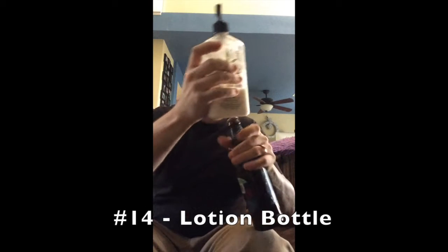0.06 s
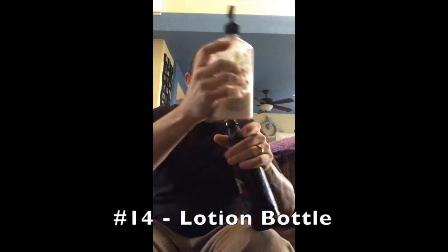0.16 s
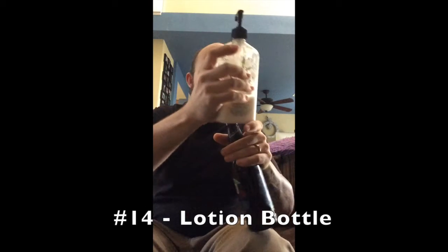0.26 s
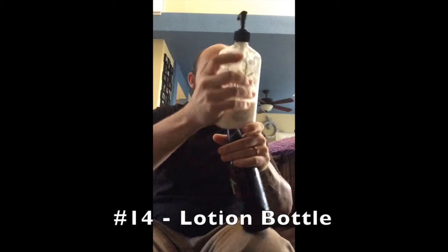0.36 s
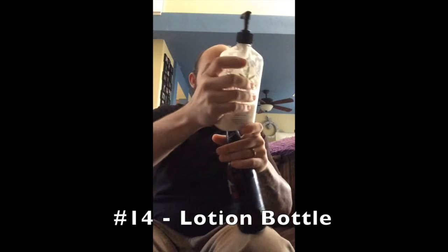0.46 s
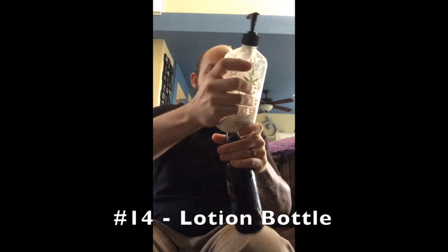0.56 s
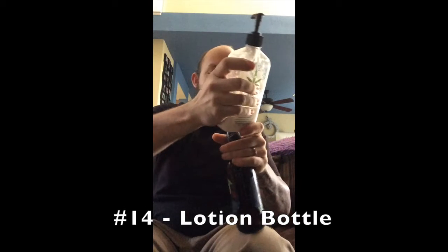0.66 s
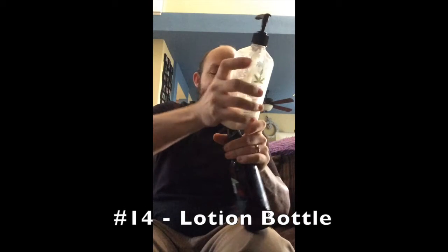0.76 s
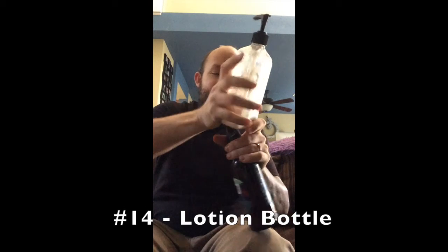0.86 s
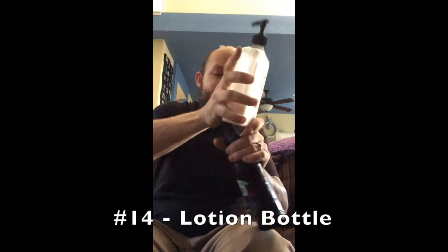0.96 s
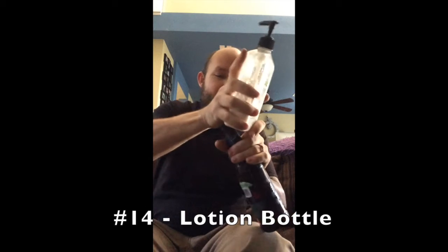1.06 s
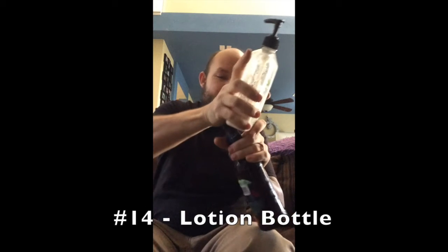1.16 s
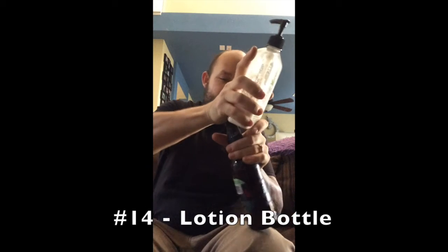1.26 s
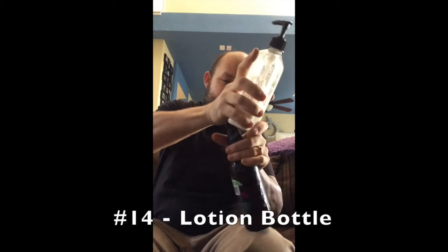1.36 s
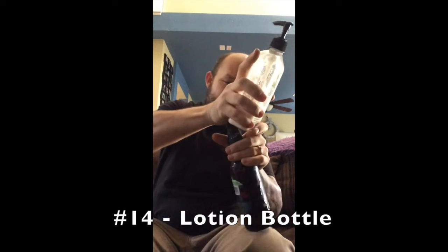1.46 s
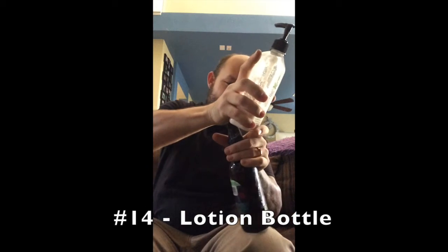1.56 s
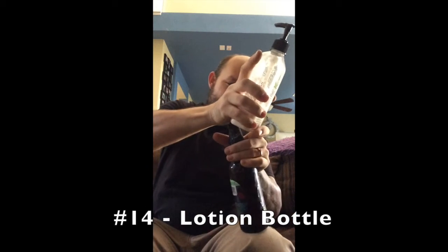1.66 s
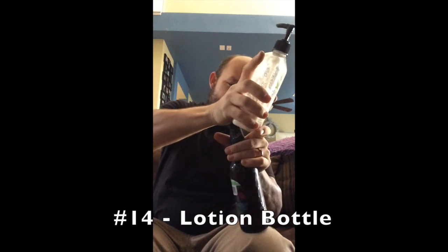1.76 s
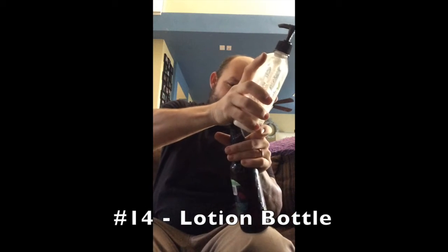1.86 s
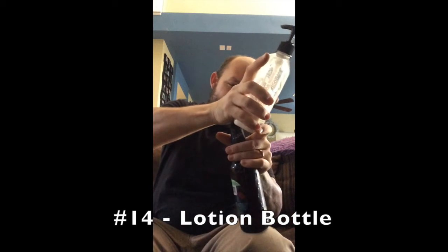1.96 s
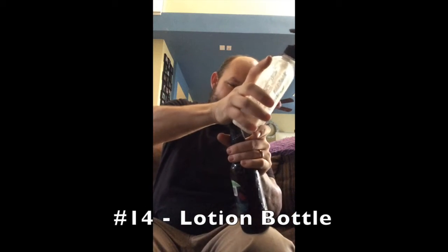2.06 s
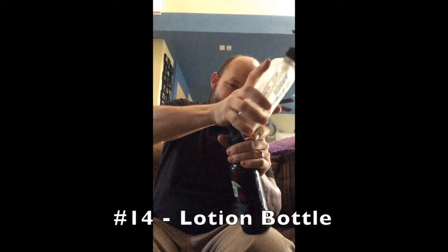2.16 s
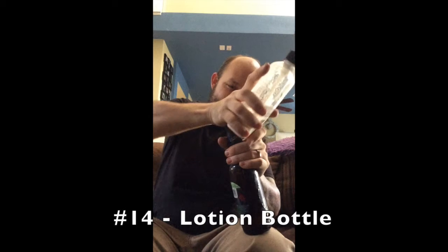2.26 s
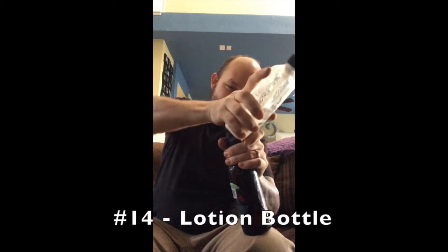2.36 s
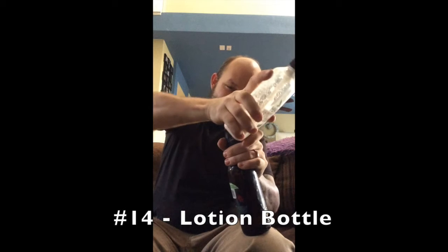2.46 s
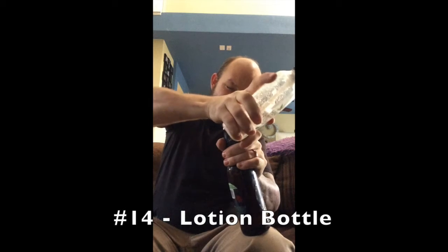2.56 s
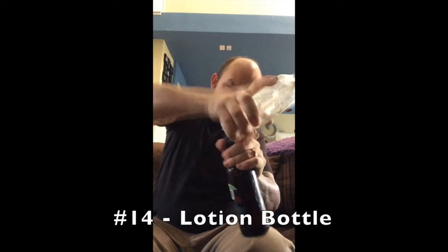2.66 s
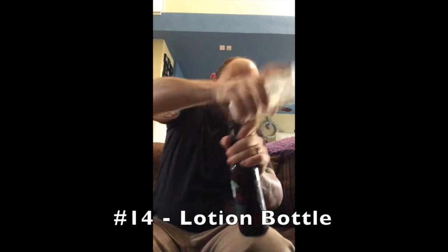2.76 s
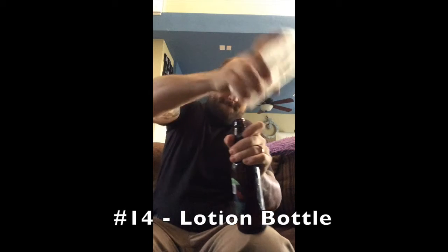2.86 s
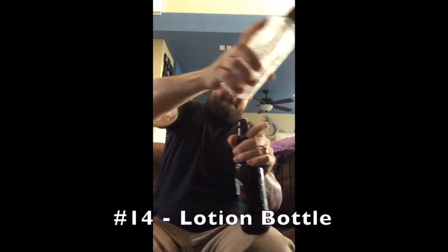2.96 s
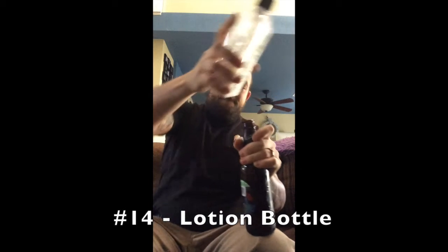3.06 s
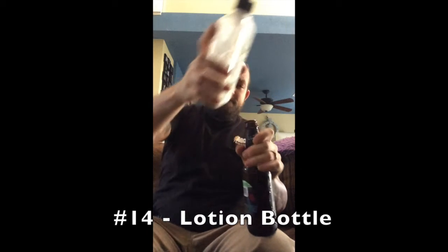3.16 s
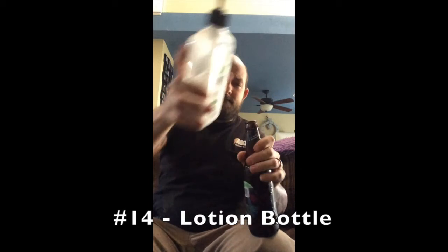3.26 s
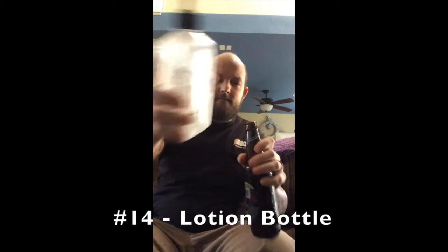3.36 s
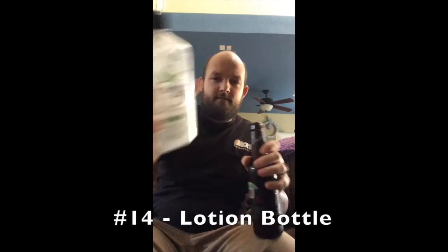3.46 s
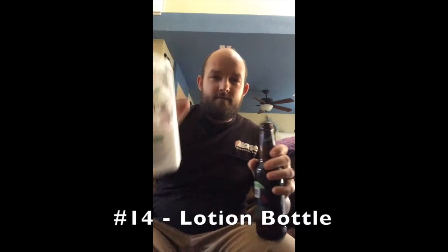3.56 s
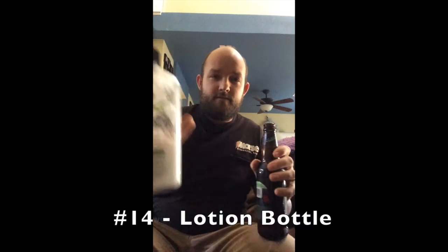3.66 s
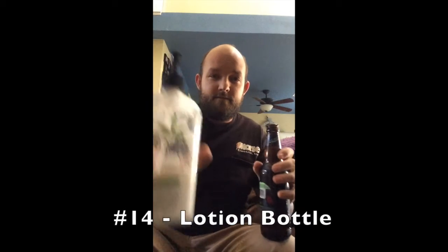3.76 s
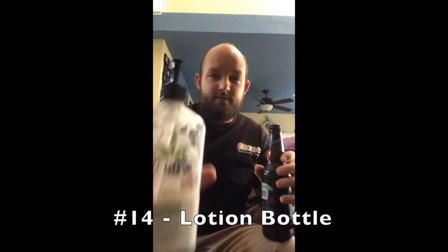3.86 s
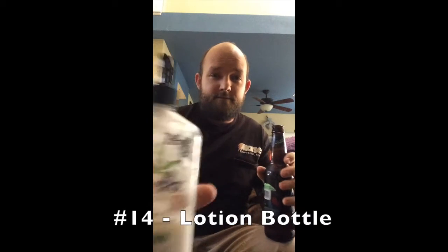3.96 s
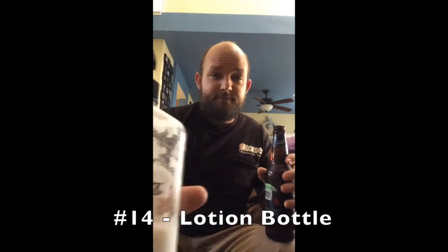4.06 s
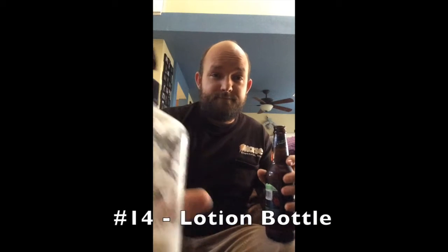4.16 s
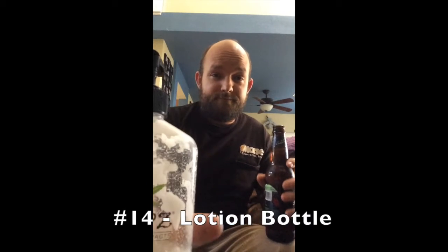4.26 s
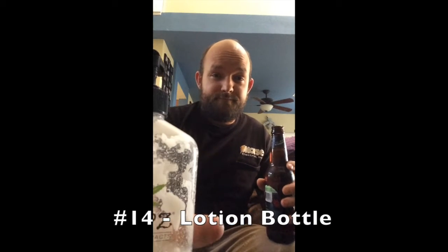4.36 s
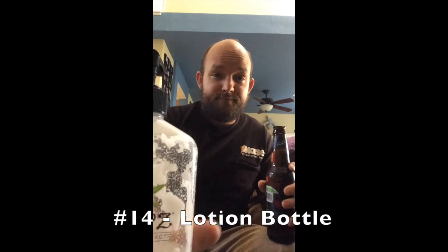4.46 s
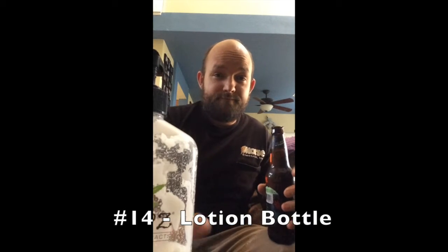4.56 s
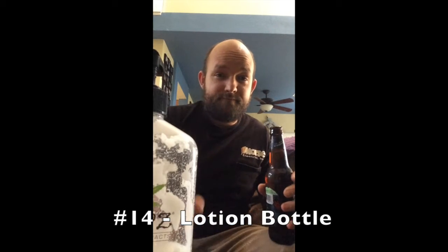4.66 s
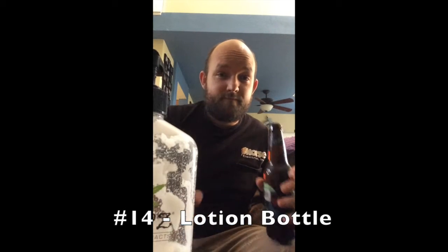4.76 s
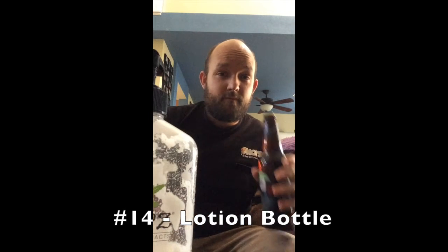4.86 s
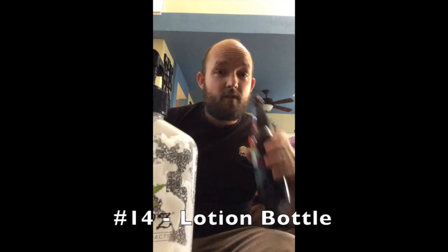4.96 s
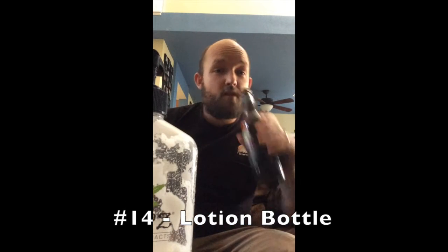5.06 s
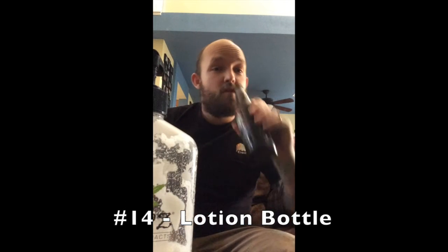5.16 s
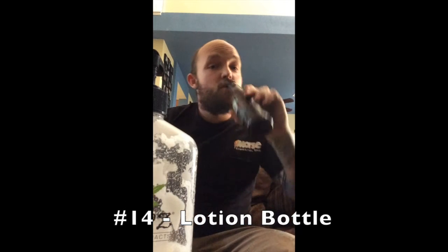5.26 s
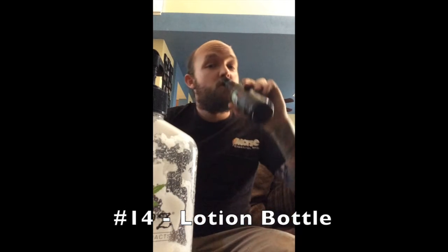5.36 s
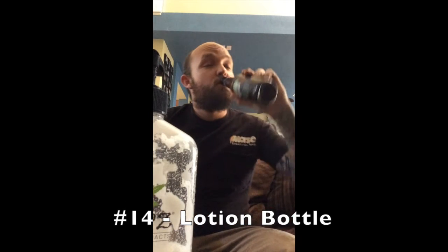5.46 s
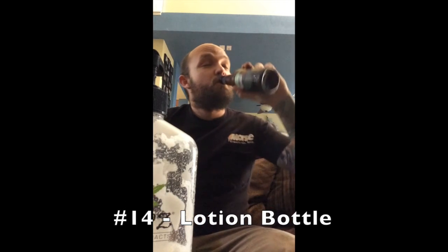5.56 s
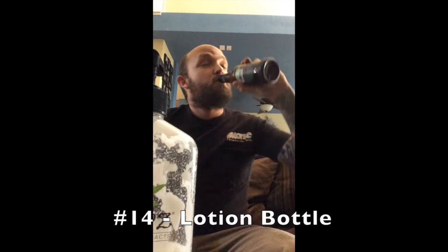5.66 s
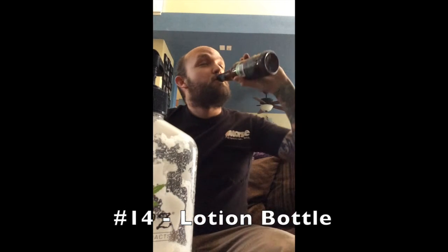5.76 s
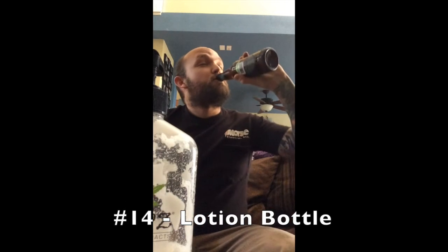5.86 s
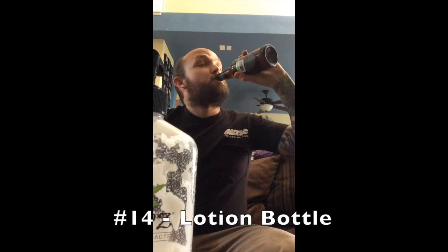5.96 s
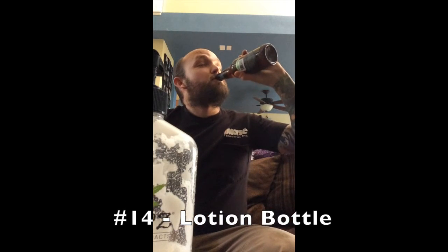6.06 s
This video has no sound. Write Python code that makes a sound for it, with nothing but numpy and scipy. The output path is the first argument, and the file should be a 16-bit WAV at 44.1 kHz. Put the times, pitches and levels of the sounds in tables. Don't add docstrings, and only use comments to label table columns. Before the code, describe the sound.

Soft rustling over a faint fan hum, a dull plastic tap, a short fizz into a sharp ringing bottle pop, then a plastic bottle thuds on wood.

```python
import sys
import numpy as np
from scipy import signal
from scipy.fft import rfft, irfft, next_fast_len
from scipy.io import wavfile
from scipy.ndimage import map_coordinates

SR = 44100
rng = np.random.default_rng(int(sys.argv[2]) if len(sys.argv) > 2 else 0)


def level_to_linear(level):
    exponent = np.asarray(level, float) / 20
    return 10 ** exponent


def dump_mix(stems):
    frames = np.atleast_2d(stems).T
    limited = np.clip(frames, -1, 1)
    pcm = np.round(limited * 32767).astype(np.int16)
    wavfile.write(sys.argv[1], SR, pcm)


N = 270091
TIME_S = np.arange(N) / SR

# start_s, ring_db, crack_db, room_db
CONTACTS = [
    (0.2387, -21.5, -28.5, -42),
    (2.705, -7.5, -11, -29.5),
    (4.276, -8, -13.5, -20.5),
]
# crack_t60_s, room_build_up_s
CONTACT_TIMES = [
    (.012, .007),
    (.022, .016),
    (.012, .006),
]
# frequency_hz, level_db
PLASTIC_CRACK = [(40, -20), (150, -19), (600, -20), (1500, 1), (4000, -7), (5500, -17), (7000, -17.5),
                 (10000, -27.5), (15300, -31.5), (16400, -35)]
# frequency_hz, density_db (per Hz)
ROOM_AIR = [(150, -10), (300, 0.5), (600, -3.5), (1100, -12.5), (1330, -9.5), (1450, -9), (1700, -10.5),
            (2200, -17), (3200, -22), (5000, -29), (8000, -33), (8600, -37), (15200, -49), (15600, -69.5)]


def unit(x):
    return x / np.sqrt(np.mean(x ** 2) + 1e-20)


def along(points, hz):
    point_hz, value = np.transpose(points)
    return np.interp(np.log(hz + 1), np.log(point_hz + 1), value)


def noise(n, gain):
    m = next_fast_len(n + 4096)
    spectrum = rfft(rng.standard_normal(m)) * gain(np.fft.rfftfreq(m, 1 / SR))
    return unit(irfft(spectrum, m)[:n])


def shape(points):
    return lambda hz: level_to_linear(along(points, hz))


def peaks(modes):
    def gain(f):
        return sum(level_to_linear(db) * (f * w) ** 2 / ((c * c - f * f) ** 2 + (f * w) ** 2) for c, w, db in modes)
    return gain


def wobble(rate):
    knots = rng.standard_normal(int(N * rate / SR) + 4)
    return map_coordinates(knots, [np.arange(N) * rate / SR])


def ring(t, hz, db, t60, rise):
    onset = 1 - np.exp(-t / abs(rise))
    return level_to_linear(db - 60 * t / abs(t60)) * onset * np.sin(2 * np.pi * hz * t)


def add(track, s, x):
    part = track[round(s * SR):][:len(x)]
    part += x[:len(part)]


def room(colour, gap, slow):
    # frequency_hz, t60_s
    wall_decay = [(100, .26), (400, .22), (1000, .27), (3000, .3), (8000, .31), (15000, .3)]
    hz, t, z = signal.stft(noise(SR, colour), SR, nperseg=256)
    t60 = slow * along(wall_decay, hz)[:, None]
    tail = signal.istft(z * level_to_linear(-60 * t / t60), SR, nperseg=256)[1]
    return tail[:SR] * (1 - np.exp(-(np.arange(SR) / SR / gap) ** 2))


def blow(contact, timing, modes, colour, answer):
    out, t = np.zeros(N), np.arange(SR // 2) / SR
    s, ring_db, crack_db, room_db = contact
    crack_t60, gap = timing
    add(out, s, level_to_linear(ring_db) * sum(ring(t, *mode) for mode in modes))
    crack = level_to_linear(crack_db - 60 * t / crack_t60) * noise(len(t), shape(colour))
    add(out, s - .0006, crack * (1 - np.exp(-t / 0.001)))
    clumps = level_to_linear(1.0 * wobble(60)[:SR])
    add(out, s, level_to_linear(room_db) * room(shape(answer), gap, slow=1) * clumps)
    return out


def background():
    # frequency_hz, density_db (per Hz)
    rumble_colour = [(25, -12.5), (45, -8), (68, 4), (100, -4), (125, 0.5), (150, -41)]
    # frequency_hz, width_hz, level_db
    hum_modes = [(176.65, 44, -1), (263, 58, -8.5)]
    # centre_s, half_width_s, change_db
    hum_swells = [(.2, .3, 1.5), (2.65, 0.093, 2.5), (3.3, .17, -3.5), (4.57, 0.13, -9.5), (5.25, 0.35, 1)]
    # frequency_hz, level_db
    motor = [(59.2, -82), (177.6, -70), (597.5, -84), (1319, -85.5), (1470, -87)]
    rumble_db, hum_db, air_db = -68, -63, -64.5
    rumble_follows = .6
    swell_db = sum(db * np.exp(-((TIME_S - s) / width) ** 2) for s, width, db in hum_swells)
    rumble = level_to_linear(rumble_db + rumble_follows * swell_db + 1.8 * wobble(4.1)) * noise(N, shape(rumble_colour))
    tones = np.zeros(N)
    for hz, db in motor:
        level = level_to_linear(db + 3.1 * wobble(6.6))
        tones += level * np.sin(2 * np.pi * hz * TIME_S + 1.6 * wobble(7.4))
    hum = level_to_linear(swell_db) * (level_to_linear(hum_db + 1.5 * wobble(3.1)) * noise(N, peaks(hum_modes)) + tones)
    return rumble + hum + level_to_linear(air_db + 0.47 * wobble(5.6)) * noise(N, shape(ROOM_AIR))


def rustle():
    # start_s, hold_s, level_db, fade_db_per_s
    slides = [(0, .005, -75, 380), (0.112, .03, -74, 400), (.455, .005, -82, 220),
              (0.749, 0.028, -70.5, 200), (0.867, .12, -69, 170), (1.303, 0.055, -87, 40),
              (2.092, .02, -76.5, 100), (2.147, 0.029, -74, 550), (3.374, 0.058, -79, 60),
              (3.72, .18, -78.5, 249.5), (4.499, 0.027, -73, 803), (4.666, 0.33, -76, 60)]
    # frequency_hz, density_db (per Hz)
    cloth = [(1000, -29.5), (2500, -1), (4400, -7.5), (7600, -3), (8900, -9), (11000, -8), (15200, -12.5),
             (15600, -44.5)]
    rise_db_per_s, end_s, at_rest_db = 600, .16, -96.5
    level = level_to_linear(at_rest_db)
    for s, hold, db, fade in slides:
        after = np.maximum(TIME_S - s - hold, 0)
        slope = rise_db_per_s * (np.maximum(s - TIME_S, 0) + np.maximum(after - end_s, 0))
        level = level + level_to_linear(db - fade * after - slope)
    return level * level_to_linear(1.3 * wobble(120)) * noise(N, shape(cloth))


def touches():
    # start_s, peak_db, centre_hz,
    # relative_width (width / centre)
    small_touches = [(.106, -48, 11000, .8), (.1192, -33, 8100, 0.2), (0.119, -36, 12000, 0.42),
                     (.454, -62, 4000, 1.5), (.459, -56.5, 2000, 0.81), (0.884, -55, 4000, 1.2),
                     (0.9898, -45.5, 1300, 1), (1.052, -56, 2500, 0.86), (1.057, -52, 5500, 0.64),
                     (1.0893, -55, 8000, .6), (1.0942, -50, 9350, 0.22), (1.094, -50.5, 4000, 1.8),
                     (1.129, -60, 8000, .6), (2.29, -46.5, 9000, 2.2), (2.29, -47.5, 2170, 1.1),
                     (2.31, -58, 11000, .6), (2.4415, -53, 12000, .83), (2.7295, -30, 6500, 0.35),
                     (2.7295, -39, 2500, .8), (3.0201, -40, 10000, .5), (3.0212, -44.5, 6500, .6),
                     (3.092, -58, 6500, .6), (3.269, -49.5, 9000, 2.1), (3.387, -52, 7520, 0.74),
                     (3.3882, -46.5, 1800, 1.3), (4.169, -51, 2500, 1.3), (4.9776, -38, 6190, 0.14),
                     (4.978, -38, 11700, .35), (4.9774, -51, 3530, 0.79), (5.0864, -53, 3463, 1.3),
                     (.341, -39, 485, .94), (.342, -52, 1700, 0.9), (1.011, -52, 1500, 1.4), (1.39, -57, 3400, .4),
             (3.481, -50.5, 600, 1.5), (3.523, -58.5, 3000, 1.5), (3.716, -57.5, 4000, 1.1),
             (.458, -42.5, 180, 3), (.987, -43.5, 180, 1.3), (1.011, -45, 152, 0.83),
             (3.475, -39.5, 116.7, 1.08), (4.179, -45.5, 104, 4.3)]
    # start_s, frequency_hz,
    # level_db, t60_s, rise_s
    clinks = [(.2665, 3430, -52, 0.064, .002), (.3135, 3480, -58, 0.05, .002),
              (.355, 3330, -66, 0.12, .005), (.13, 1560, -60, .3, .03), (.755, 2500, -57, 0.072, 0.0092),
              (2.7334, 5290, -32.5, 0.062, 0.0017), (3.022, 9460, -58, .045, 0.0011),
              (3.022, 6770, -64, 0.053, .001), (3.268, 3430, -48, 0.049, 0.00055),
              (3.2697, 3290, -52.5, .04, 0.00097), (3.289, 1670, -50, 0.027, 0.0018),
              (3.41, 5200, -68, .03, .001), (4.963, 1000, -47, 0.013, 0.00051),
              (5.911, 265, -36, 0.02, 0.0023)]
    out, t = np.zeros(N), np.arange(SR // 8) / SR
    for s, db, hz, width in small_touches:
        t60 = .011 * (8000 / hz) ** .45
        trace = level_to_linear(-28 - 60 * t / 0.18) * (1 - np.exp(-t / 0.00945))
        fall = level_to_linear(-60 * t / t60) + trace
        burst = noise(len(t), peaks([(hz, hz * width, 0)]))
        add(out, s, level_to_linear(db - 5.5) * fall * (1 - np.exp(-t / 0.0004)) * burst)
    for s, *mode in clinks:
        add(out, s, ring(t, *mode))
    return out


def lead_in():
    # end_s, level_db (reached at the end), centre_hz
    lead_swells = [(0.2403, -61, 3700), (2.7033, -43, 1600), (2.705, -44.5, 6800), (2.7049, -51, 3500),
                   (4.276, -36, 203), (4.275, -59, 5500), (4.274, -55.5, 3200), (2.705, -49.5, 520),
                   (4.275, -52, 640), (.239, -57, 1000)]
    out, t = np.zeros(N), np.arange(-SR // 20, 0) / SR
    for s, db, hz in lead_swells:
        add(out, s + t[0], level_to_linear(db + 990 * t) * noise(len(t), peaks([(hz, 0.3 * hz, 0)])))
    return out


def tap():
    # frequency_hz, level_db, t60_s, rise_s
    tapped = [(165, -16.5, 0.15, 0.0016), (429, -4, 0.071, 0.0042), (490, 3.5, 0.031, 0.0032),
              (1450, -7.5, 0.029, .001), (800, 7.5, 0.012, 0.00097), (1000, -3.5, 0.014, 0.0013),
              (1975, 1, 0.0089, 0.00047), (3305, -10, 0.037, 0.0022), (3280, -34, .25, .005),
              (1890, -26, .1, .003), (4260, -20, .012, 0.00063)]
    # frequency_hz, density_db (per Hz)
    tap_room = [(150, -52), (250, -27), (434, 2.5), (542, -5), (678, -10), (1080, -22), (1840, -17),
                (2740, -31), (3360, -26), (5000, -43), (15300, -58)]
    return blow(CONTACTS[0], CONTACT_TIMES[0], tapped, PLASTIC_CRACK, tap_room)


def late_room():
    # frequency_hz, width_hz, level_db
    glass = [(3470, 120, 4), (3740, 260, -1), (5100, 160, -4), (5290, 170, -4), (6450, 350, -13),
             (7850, 250, -13)]
    # start_s, level_db, slowdown (times the room's decay)
    late_air = [
        (2.705, -41.5, 2.2),
        (4.276, -40.5, 1.75),
    ]
    out = np.zeros(N)
    add(out, CONTACTS[0][0], level_to_linear(-67.5) * room(peaks(glass[:1]), gap=.02, slow=1.9))
    add(out, CONTACTS[1][0], level_to_linear(-46) * room(peaks(glass), gap=0.0246, slow=1.9))
    for s, db, slow in late_air:
        add(out, s, level_to_linear(db) * room(shape(ROOM_AIR), gap=0.038, slow=slow))
    return out


def gas():
    # time_s, level_db
    leak = [(2.512, -84), (2.518, -59.5), (2.548, -43.5), (2.57, -37), (2.6, -36), (2.618, -41.5),
            (2.63, -54.5), (2.655, -61.5), (2.69, -72)]
    # frequency_hz, density_db (per Hz)
    jet = [(1760, -48), (3000, -12.5), (4000, -7), (4800, -13), (7700, -1.5), (8900, -10), (10100, -3),
           (11300, -10.5), (13600, 0.5), (15200, -10), (15700, -33), (16200, -62)]
    # frequency_hz, width_hz, level_db
    gap_modes = [(1192, 890, -6), (1800, 1000, 0)]
    neck_db, opens_s, shut_db = -11, 2.543, -7
    s, db = np.transpose(leak)
    jet_db = np.interp(TIME_S, s, db, -120, -120) + 1.8 * wobble(300)
    shut = np.clip((opens_s - TIME_S) / .008, 0, 1)
    neck = level_to_linear(neck_db + shut_db * shut) * noise(N, peaks(gap_modes))
    return level_to_linear(jet_db) * (noise(N, shape(jet)) + neck)


def pop():
    # frequency_hz, level_db, t60_s, rise_s
    popped = [(202.4, -22.5, 0.082, 0.00075), (275, -18, .05, .002), (395, -11.5, 0.026, 0.00064),
              (100.1, -21, .05, 0.00077), (500, -14, .03, .001), (565, -9.5, 0.055, .001),
              (830, -0.5, 0.091, 0.0021), (1150, -2.5, 0.015, 0.00022), (1670, -9.5, 0.026, 0.00046),
              (3452, -16, 0.042, .001), (3850, -16.5, 0.025, .001), (5120, -12.5, 0.034, 0.0016),
              (6380, -25, 0.0319, 0.00097), (7840, -11.5, 0.0257, 0.0012)]
    # frequency_hz, level_db
    snap = [(40, -21), (300, -1.5), (1200, 1.5), (2500, -7), (5000, -5), (12000, -11.5), (15300, -13.5),
            (16400, -12)]
    # frequency_hz, density_db (per Hz)
    pop_room = [(60, -40.5), (100, -15), (140, -20.5), (275, -8.5), (465, -12.5), (600, -4), (790, -4),
                (1280, -17), (1710, -14), (2900, -28), (3700, -21.5), (4510, -28), (9500, -31.5),
                (15200, -38)]
    return blow(CONTACTS[1], CONTACT_TIMES[1], popped, snap, pop_room)


def far_walls():
    # start_s, frequency_hz, level_db, rise_s, t60_s
    returns = [(2.785, 800, -31.5, 0.0066, 0.078), (2.816, 830, -32, 0.0033, 0.23),
               (2.905, 836, -42.5, 0.012, 0.22), (3.01, 830, -50.5, 0.013, 0.23),
               (3.085, 825, -58, .015, 0.24)]
    out, t = np.zeros(N), np.arange(SR // 4) / SR
    for s, hz, db, rise, t60 in returns:
        add(out, s, ring(t, hz, db, t60, rise) * np.exp(-(t / 0.074) ** 8))
    add(out, CONTACTS[1][0], level_to_linear(-45) * room(peaks([(814.5, 90, 0)]), gap=0.033, slow=2.5))
    return out


def knock():
    # frequency_hz, level_db, t60_s, rise_s
    table_modes = [(60.2, -36.5, .04, 0.0025), (119.4, -35, 0.7, 0.011), (134.5, -12.5, 0.21, 0.002),
                   (339.3, -11.5, 0.14, .003), (404, -11, 0.044, 0.0013), (478, 7.5, 0.02, 0.0015),
                   (1290, -1, 0.011, 0.0019), (1600, -1, 0.01, 0.0017), (2040, -5, 0.01, 0.0016),
                   (264, -20.5, 0.26, .004), (157, -19, 0.22, .004), (292.5, -21, 0.15, 0.0046)]
    # frequency_hz, density_db (per Hz)
    knock_room = [(100, -38), (201, -10.5), (306, 5), (591, -2), (800, -14), (1070, -14.5), (2260, -22.5),
                  (3000, -36), (3800, -32.5), (8000, -47.5), (13400, -48), (14200, -68.5)]
    return blow(CONTACTS[2], CONTACT_TIMES[2], table_modes, PLASTIC_CRACK, knock_room)


def scene():
    steady = background() + rustle()
    small_sounds = touches() + lead_in()
    opening = tap() + gas() + pop()
    return (steady + small_sounds + opening + knock() + late_room() + far_walls())[None]


def band_limit(x):
    return signal.sosfilt(signal.butter(12, 16470, fs=SR, output="sos"), x)


def record(dry):
    # frequency_hz, gain_db
    mic_band = [(20, -9), (35, -6), (55, 0), (15250, 0), (15500, -22), (16400, -30), (16500, -100)]
    hz = np.fft.rfftfreq(N, 1 / SR)
    mix = irfft(rfft(dry) * level_to_linear(along(mic_band, hz)), N)
    return band_limit(mix)


dry = scene()
out = record(dry)
dump_mix(out)
```